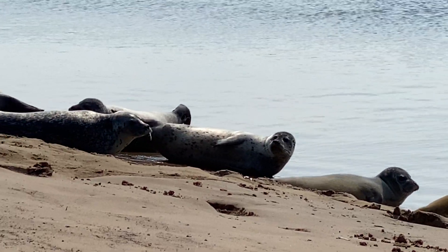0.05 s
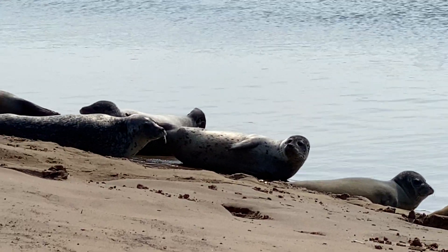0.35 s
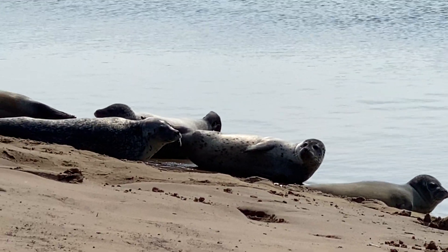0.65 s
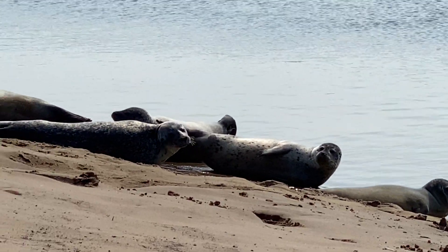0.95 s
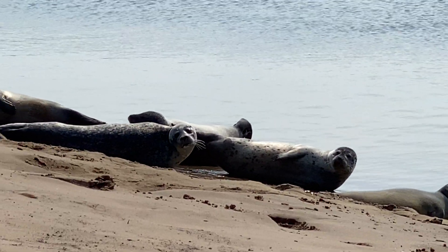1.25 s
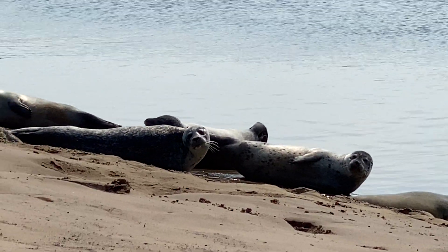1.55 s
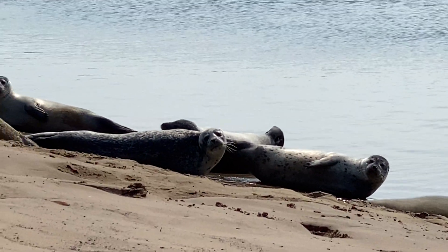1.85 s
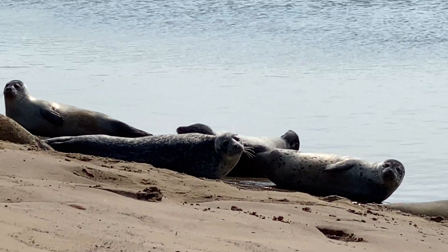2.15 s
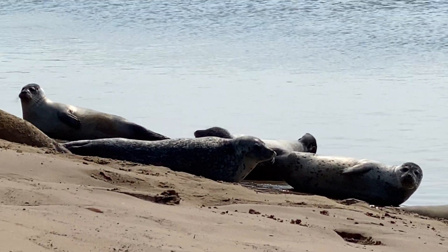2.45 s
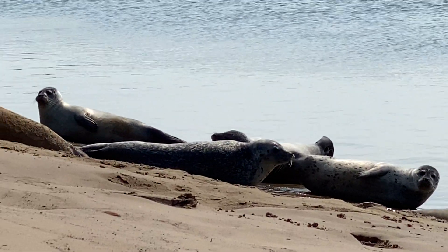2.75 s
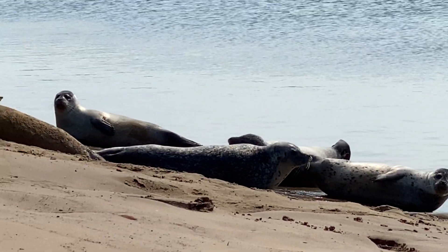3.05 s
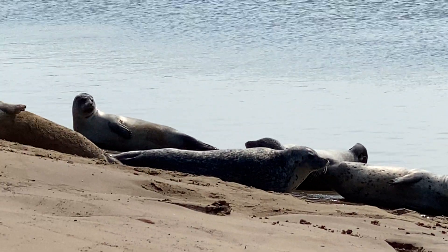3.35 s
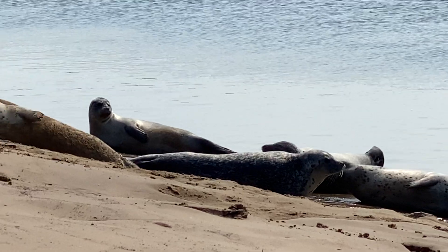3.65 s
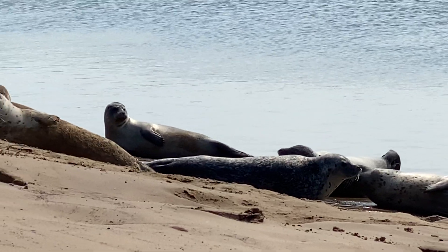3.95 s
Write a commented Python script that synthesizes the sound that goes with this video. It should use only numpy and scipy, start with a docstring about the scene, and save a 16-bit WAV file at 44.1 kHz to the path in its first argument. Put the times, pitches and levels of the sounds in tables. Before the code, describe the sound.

Seals give a harsh cry and a wavering wail over gusty wind on the microphone.

```python
"""A seal's harsh cry dies away on a distant sandbank while gusts buffet the microphone.
Faint yelps answer, and later a clear wail wavers: all are throat pulses and air shaped by resonances.
The wind is turbulence at the microphone's two ports: a low rumble, with short eddies that grow
brighter as they grow stronger. Small birds whistle faintly over soft rustles and the hush of the
water, and the banks return a dull echo."""
import sys
import numpy as np
from scipy import signal
from scipy.fft import rfft, irfft
from scipy.io import wavfile

SR = 44100
rng = np.random.default_rng(int(sys.argv[2]) if len(sys.argv) > 2 else 0)


def output_pcm(signal):
    """Save a mono or channel-first signal as 16-bit PCM at the path in sys.argv[1].

    Samples are clipped to [-1, 1] before scaling.
    """
    pcm = np.clip(np.atleast_2d(signal).T, -1, 1) * 32767
    wavfile.write(sys.argv[1], SR, np.round(pcm).astype(np.int16))


N = 176400
T = np.arange(N) / SR
FREQS = np.maximum(np.fft.rfftfreq(N, 1 / SR), 1)

# throat resonances of the wail and the yelps: f/Hz, gain/dB
THROAT_FORMANTS = [(550,-22.5),(800,-22.5),(1150,3),(1400,-5.5),(1780,1.5),(1980,-4),(2300,-17.5),(2900,-39),(3600,-60.5)]
# slow course of the wind: t/s, relative rumble level/dB, relative force/dB
GUSTS = [(0,-42.5,-59),(.19,-36,-45),(.4,-45,-42.5),(.58,-34,-51.5),(.8,-50,-67),(.85,-44.5,-43.5),(1.01,-31,-45.5),(1.76,-37.5,-53.5),(1.9,-45,-37),(2.03,-17.5,-40),(2.06,-34,-41.5),(2.41,-27,-33),(2.52,-29,-38.5),(2.83,-34.5,-50.5),(3.13,-32,-47.5),(3.46,-41.5,-52),(3.69,-30,-44.5),(4,-41.5,-58.5)]


def cry():
    """Source and filter: rough, sinking throat pulses excite two groups of resonances."""
    # course of the cry: t/s, pitch f/Hz, throat level/dB, treble level/dB, rasp/1
    course = [(0,590.3,-47,-63.5,.9),(.03,615,-46.5,-64,1),(.075,611,-48.5,-64,1),(.12,586.6,-49,-63,.85),(.16,556,-54.5,-64.5,.65),(.195,520,-56,-76,0.6),(.225,489,-71,-91.5,.4)]
    # lower and upper resonances: f/Hz, gain/dB
    throat = [(550,-23.5),(950,-26),(1180,4.5),(1450,3),(1800,-2),(2050,-8),(2280,-12),(2600,-27.5),(3400,-49.5)]
    treble = [(2400,-22),(3000,-5),(3600,-0.5),(4080,10),(4650,1),(5200,-26),(6200,-22.5),(7100,5.5),(7800,6),(8700,-34.5),(10300,-19),(12000,-37)]
    source = larynx(curve(course), rasp=curve(course, column=4))
    return vocal_tract(source, throat, course, column=2) + vocal_tract(source, treble, course, column=3)


def wail():
    """Frequency modulation: a wavering pitch sweeps the harmonics across fixed resonances."""
    # melody: t/s, f/Hz
    melody = [(2.79,622),(2.825,650),(2.85,580),(2.892,574),(2.916,636),(2.93,628),(2.946,650),(2.98,600),(3.024,606),(3.045,642),(3.075,658),(3.12,620),(3.147,682),(3.166,650),(3.186,580),(3.25,574),(3.295,562),(3.336,604),(3.38,586)]
    # course of the wail: t/s, throat level/dB, treble level/dB, top level/dB, rasp/1
    course = [(2.76,-81.5,-105,-115,.1),(2.80,-75,-76,-108,.05),(2.825,-57.5,-72.5,-100,0),(2.85,-60.5,-67.5,-85,0.2),(2.90,-48.5,-75,-90,.05),(2.94,-50.5,-69.5,-79.5,0.1),(2.986,-47.5,-79,-78.5,.1),(3.02,-54,-76,-83,0.3),(3.05,-56.5,-72.5,-82,.35),(3.12,-54,-66.5,-78,0.4),(3.15,-53.5,-69,-77.5,.3),(3.19,-50.5,-69.5,-77.5,0),(3.29,-58.5,-74,-76,0.3),(3.335,-57,-72.5,-95.5,0.5),(3.39,-75.5,-79.5,-105,.8)]
    # upper and highest resonances: f/Hz, gain/dB
    treble = [(2300,-18.5),(3100,-0.5),(3550,-5),(4050,2),(4600,-6),(5200,-8.5),(5900,-17),(6800,-48)]
    top = [(5000,-36.5),(5800,-17),(6400,1.5),(6950,3),(7500,-5),(8600,-22),(10400,-17),(12000,-42)]
    pitch = curve(melody) * (1 + 0.0066 * walk(170))
    source = larynx(pitch, rasp=curve(course, column=4))
    return (vocal_tract(source, THROAT_FORMANTS, course, column=1)
            + vocal_tract(source, treble, course, column=2)
            + vocal_tract(source, top, course, column=3))


def yelps():
    """Amplitude envelopes: half-sine swells cut faint, gliding answers from a rough voice."""
    # calls: start t/s, length/s, f/Hz, fractional fall in pitch/1, level/dB
    calls = [(0.254,.11,640,0.071,-66),(0.346,0.056,599.4,0.074,-62.5),(0.408,.06,654.5,0.09,-66),(3.331,.11,716,-.02,-61)]
    pitch, envelope = np.full(N, 600.), 0
    for start, length, hz, fall, db in calls:
        progress = np.clip((T - start) / length, 0, 1)
        pitch = np.where(progress > 0, hz * (1 - fall * progress ** 2), pitch)
        envelope = envelope + undb(db) * np.sin(np.pi * progress)
    return envelope * unit(colour(larynx(pitch, rasp=0.75), THROAT_FORMANTS))


def larynx(pitch, rasp, jitter=0.021, shimmer_db=5.5):
    """Phonation: pulses with shimmering harmonics; rasp adds jitter and a puff of air in each cycle."""
    phase = 2 * np.pi * np.cumsum(pitch * (1 + jitter * rasp * walk(500))) / SR
    pulses = sum(np.cos(k * phase) * undb(shimmer_db * min(k / 6, 1) * walk(39)) for k in range(1, 20))
    air = noise() * (1 + np.cos(phase)) * undb(3 * walk(300))
    breathiness = np.clip(0.62 * rasp, 0, 1)
    return np.sqrt(1 - breathiness ** 2) * unit(pulses) + breathiness * np.sqrt(2) * unit(air)


def vocal_tract(source, formants, course, column, attack_s=0.0091, release_s=0.053):
    """Resonance: one group of formants colours a voice, whose level follows a column of its course."""
    attack = np.clip((T - course[0][0]) / attack_s, 0, 1)
    release = np.exp(-np.maximum(T - course[-1][0], 0) / release_s)
    return unit(colour(source, formants)) * undb(curve(course, column)) * attack * release


def turbulence():
    """Turbulent pressure at two ports: bands follow the force; small eddies differ between the ports."""
    # wind spectrum at the reference force: f/Hz, density level/dB, growth/(dB per dB of force)
    bands = [(30,-76.5,2.76),(86,-59,0.08),(194,-53.5,0.43),(428,-56,0.91),(658,-59.5,1.0),(1006,-65.5,1.3958),(1264,-71.5,1.3),(1606,-90.5,1.61),(2080,-108,1.28),(2970,-123,0.2),(5000,-145,1),(9000,-175,-0.7)]
    # part that differs between the ports: f/Hz, gain/dB
    incoherence = [(150,-56.5),(300,-45),(450,-28.5),(700,-6.5),(1100,-0.5),(2000,-1)]
    force_db, bright_db, thump_db = eddies()
    white = rng.standard_normal((2, N)) * np.sqrt(SR / 2)
    log_centres = np.log([row[0] for row in bands])
    spectra = 0
    for (hz, _, growth), this_band in zip(bands, np.eye(len(bands))):
        highs = np.clip(np.log2(hz / 650), 0, 1)
        lows = np.clip(np.log2(500 / hz), 0, 1)
        gain = undb(growth * force_db + bright_db * highs + (thump_db - 4) * lows)
        passband = np.interp(np.log(FREQS), log_centres, this_band)
        spectra = spectra + rfft(white * gain) * passband
    mid, diffuse = irfft(spectra * undb(spectrum_db(bands)), N)
    side = colour(diffuse, incoherence)
    return mid + np.array([side, -side])


def eddies(reference_db=-28.5, edge_s=.008, skirt_db=-10.5, skirt_s=0.0046):
    """Incoherent addition: gust and eddies sum in power, giving force, brightness and thump in dB."""
    # eddies striking the microphone: start t/s, length/s, force/dB, brightness/dB, thump/dB
    buffets = [(0.019,0.0067,-35.5,2.5,0.5),(0.073,0.01,-40,-6,3.5),(0.171,0.012,-30.5,-11,6),(0.201,.014,-27,-10,7.5),(0.241,0.036,-33.5,-7.5,8.5),(0.325,0.027,-41.5,-9,9),(0.396,0.0084,-25.5,-11.5,7),(0.417,0.025,-29.5,-12.5,7),(0.476,.008,-35,-10,3.5),(0.494,0.0089,-26.5,-19.5,2),(.53,.071,-34.5,-5.5,-0.5),(.826,.051,-37.5,-5.5,1),(0.897,.033,-33.5,-5.5,4.5),(0.931,.066,-24,1.5,-2),(1.077,0.062,-41.5,4.5,5),(1.173,0.0048,-28.5,4.5,-2),(1.27,0.0099,-35,6,2),(1.296,.042,-33,4.5,5),(1.386,.018,-30.5,13,5),(1.414,.006,-26.5,-1.5,-2),(1.5,0.036,-32.5,0.5,2),(1.553,.03,-37,-4.5,3.5),(1.612,0.029,-39.5,-0.5,2),(1.876,0.038,-32,4,8),(1.985,0.0081,-24,-4,-1),(2.002,0.016,-25.5,-11.5,13.5),(2.105,.02,-28,-3,10.5),(2.168,.042,-26.5,3,4.5),(2.2083,.012,-16,3.5,4.5),(2.252,0.0059,-23,-2.5,1),(2.285,0.037,-29.5,.5,5),(2.349,0.0048,-26,-12.5,3.5),(2.402,.016,-25.5,4.5,0.5),(2.418,0.028,-31.5,2.5,8),(2.477,.028,-27,7,9.5),(2.51,.042,-27,4,7),(2.582,.025,-31.5,0,0),(2.626,.008,-37,-3,1),(2.67,0.02,-22,-2,0.5),(2.741,0.024,-20.5,-8,0.5),(2.779,0.024,-32.5,-5.5,7),(3.005,0.039,-32.5,-3.5,2.5),(3.077,.01,-28.5,-5.5,2),(3.095,0.039,-33,-7,-1.5),(3.213,0.0078,-28.5,-11.5,7.5),(3.304,0.015,-36.5,-10.5,8),(3.375,0.033,-35.5,-9,3.5),(3.488,.023,-23,-11,0.5),(3.514,.04,-29.5,-11.5,3.5),(3.725,0.011,-19,1,3),(3.746,.008,-25,-0.5,3),(3.764,0.078,-25.5,-8.5,4.5),(3.859,.033,-35.5,-3,4.5)]
    swirl_db = 5 * walk(110)
    power = undb(curve(GUSTS, column=2) + lulls() + 0.5 + swirl_db) ** 2
    bright, thump = 0, 0
    for start, length, db, bright_db, thump_db in buffets:
        inside_s = length / 2 - abs(T - start - length / 2)
        # weaker turbulence surrounds each eddy
        skirt = undb(skirt_db) * np.exp(np.clip(inside_s / skirt_s, -20, 0))
        eddy = (undb(db) * np.clip(inside_s / edge_s + .5, skirt, 1)) ** 2
        power = power + eddy
        bright = bright + eddy * bright_db
        thump = thump + eddy * thump_db
    flutter_db = 3 * np.minimum(walk(520), 1.6)
    return 10 * np.log10(power) - reference_db + flutter_db, bright / power, thump / power


def rumble():
    """Coherent pressure fluctuation: the wind's lowest noise swells alike at both ports."""
    # rumble spectrum: f/Hz, relative level/dB
    spectrum = [(14,-56),(27,-26.5),(42,-2),(62,2),(85,-0.5),(130,-6.5),(200,-14),(320,-28),(600,-42),(1500,-90.5)]
    return unit(colour(noise(), spectrum)) * undb(curve(GUSTS) + lulls() + 1 + 2.5 * walk(30))


def lulls():
    """Intermittency: the wind slackens in brief Gaussian dips, given in dB."""
    # dips: middle t/s, length/s, level change/dB
    dips = [(0.291,0.059,-13),(0.637,.03,-7),(1.244,.035,-20.5),(1.703,0.063,-2.5),(2.089,0.037,-9.5),(2.905,0.046,-15.5),(3.281,0.026,-8.5),(3.343,0.0083,-11),(3.604,0.015,-11.5),(3.939,0.041,-8)]
    return sum(db * bell(middle, length) for middle, length, db in dips)


def birds():
    """Frequency glides: each thin whistle is a pure tone whose pitch follows a parabola."""
    # whistles: start t/s, length/s, vertex f/Hz, sag half a length away/Hz, vertex place/1, level/dB
    whistles = [(.18,.135,6650,550,0.63,-91.5),(.35,.08,3080,-220,.6,-82.5),(.475,.145,7100,750,.55,-81.5),(3.51,.04,6350,200,0.4,-91.5),(3.55,.03,6750,200,.1,-90),(3.615,.055,7900,200,.05,-84.5),(3.875,.11,7900,750,0.4,-86),(3.865,.04,6550,150,0.08,-83),(3.90,.035,6800,600,.4,-82)]
    out, waver = 0, 1 + .005 * walk(250)
    for start, length, hz, sag_hz, vertex, db in whistles:
        progress = np.clip((T - start) / length, 0, 1)
        pitch = (hz - sag_hz * (2 * (progress - vertex)) ** 2) * waver
        tone = np.sqrt(2) * np.sin(2 * np.pi * np.cumsum(pitch) / SR)
        out = out + undb(db) * np.sin(np.pi * progress) * tone
    return out


def rustles():
    """Modulated band noise: short, grainy swells of hiss."""
    # swells: middle t/s, length/s, centre f/Hz, width/Hz, level/dB
    swells = [(1.095,0.072,3650,200,-89),(1.301,.08,3540,350,-83),(1.364,.008,4850,1300,-81.5),(1.384,.035,3800,1210,-80),(1.618,0.012,2800,1110,-78),(2.237,0.073,2574,335,-62),(2.297,.09,3070,472,-75),(2.50,0.12,2600,369,-82.5),(3.575,.14,3500,697,-87),(3.79,.08,3800,450,-87.5)]
    out, grains = 0, rfft(noise() * undb(4.6 * walk(300)))
    for middle, length, hz, width_hz, db in swells:
        passband = np.exp(-.5 * ((FREQS - hz) / width_hz) ** 2)
        out = out + unit(irfft(grains * passband, N)) * undb(db) * bell(middle, length)
    return out


def echo(sound, level_db=-12, t60_s=1, damping_hz=3800):
    """Diffuse reflection: the banks return a dull tail that decays exponentially."""
    t = T[:SR]
    tail = rng.standard_normal(SR) * undb(-60 * t / t60_s) * (1 - np.exp(-t / .02))
    lowpass = signal.butter(1, damping_hz, fs=SR, output="sos")
    tail = signal.sosfilt(lowpass, tail / np.linalg.norm(tail))
    return undb(level_db) * signal.fftconvolve(sound, tail)[:N]


def water():
    """Stationary noise: the even hush of water along the shore."""
    # hush spectrum: f/Hz, density level/dB
    spectrum = [(100,-99.5),(500,-101),(1000,-104),(1500,-114),(2200,-123),(3500,-127),(5000,-130),(7600,-130),(8500,-137),(12000,-136)]
    return colour(noise(), spectrum) * np.sqrt(SR / 2)


def undb(db):
    """Decibels to amplitude ratio."""
    return 10 ** (np.asarray(db) / 20)


def curve(rows, column=1):
    """Linear interpolation of one column in time."""
    rows = np.array(rows, float)
    return np.interp(T, rows[:, 0], rows[:, column])


def bell(middle, length):
    """Gaussian window in time, of height 1."""
    return np.exp(-2 * ((T - middle) / length) ** 2)


def spectrum_db(rows):
    """Interpolation of levels over log frequency."""
    rows = np.array(rows, float)
    return np.interp(np.log(FREQS), np.log(rows[:, 0]), rows[:, 1])


def colour(x, rows):
    """Zero-phase filtering by a tabulated spectrum."""
    return irfft(rfft(x) * undb(spectrum_db(rows)), N)


def unit(x):
    """Normalisation to standard deviation 1."""
    return x / np.std(x)


def noise():
    """White Gaussian noise."""
    return rng.standard_normal(N)


def walk(rate):
    """Low-pass noise of spread 1, changing about rate times a second."""
    return unit(irfft(rfft(noise()) * np.exp(-(2 * FREQS / rate) ** 2), N))


def scene(pan_db=1.9):
    """Superposition in mid and side: distant animals, a little to the left, and water behind the wind."""
    # part of the distant sound that reaches the ports out of step: f/Hz, gain/dB
    out_of_step = [(1000,-10.5),(2000,-12),(4000,-11),(7500,-5.5),(9000,-3),(12000,-5.5)]
    far = cry() + wail() + yelps() + birds() + rustles()
    quadrature = irfft(1j * rfft(far), N)
    hush = water()
    side = undb(-19) * water() + undb(-6) * echo(far) + colour(quadrature, out_of_step)
    pan = undb(np.array([[pan_db], [-pan_db]]) / 2)
    return turbulence() + rumble() + far * pan + echo(far) + hush + np.array([side, -side])


def record(dry, cutoff_hz=12400, fade_s=.004):
    """Band limiting: a steep low-pass removes the highest treble after brief fades at both ends."""
    fade = np.minimum(np.minimum(T, T[-1] - T) / fade_s, 1)
    return signal.sosfilt(signal.ellip(8, .2, 70, cutoff_hz, fs=SR, output="sos"), dry * fade)


dry = scene()
out = record(dry)
output_pcm(out)
```